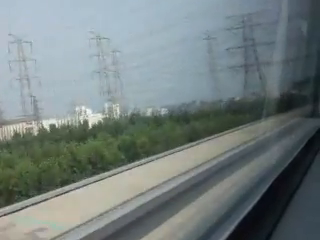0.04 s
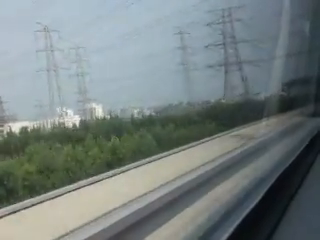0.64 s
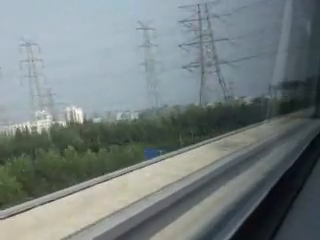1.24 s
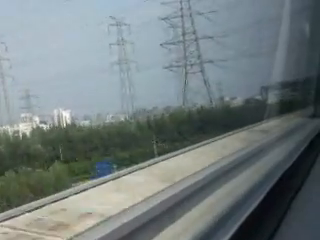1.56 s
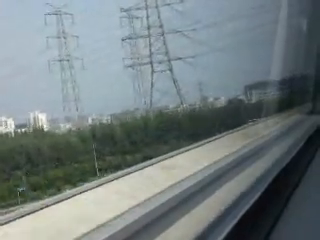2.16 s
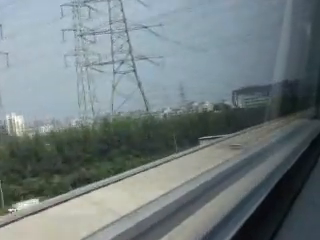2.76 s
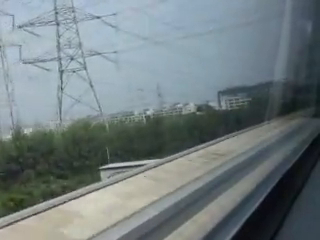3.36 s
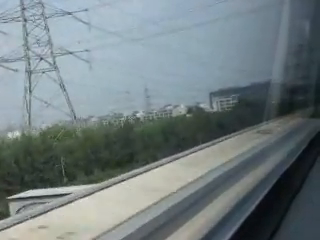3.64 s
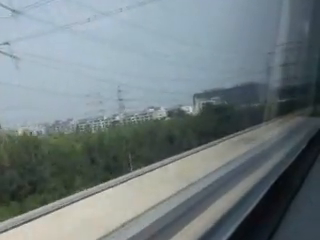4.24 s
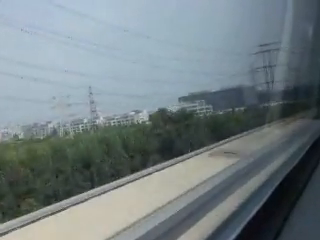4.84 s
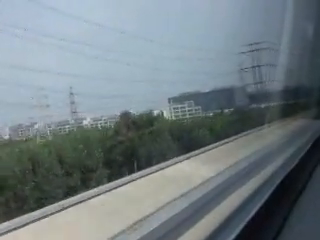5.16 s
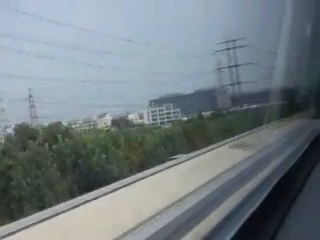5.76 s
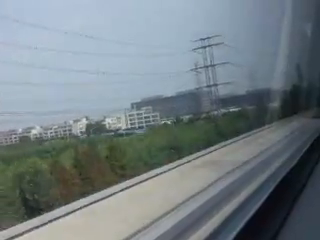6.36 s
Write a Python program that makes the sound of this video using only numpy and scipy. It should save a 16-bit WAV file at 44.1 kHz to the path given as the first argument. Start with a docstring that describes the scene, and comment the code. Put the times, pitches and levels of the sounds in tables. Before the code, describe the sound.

Inside a fast train, a deep rumble fills the car and creeps up slightly in pitch and level. Machinery throbs at one low pitch while air rushes dully past outside. Wall panels buzz faintly, a little more toward the end, and plastic trim gives two tiny ticks, one early and one late. A small microphone at the window seat gives a muffled sound with a thin high fizz.

```python
"""Rumble of a maglev train slowly gathering speed, heard from a window seat inside the car.
The guideway's stator packs and slots pull on the magnets and pass as a slowly rising drone. Wall panels
buzz, equipment hums at one pitch, air rushes over the skin outside, and the trim ticks twice.
The microphone is a pocket camera's, whose low sample rate adds a thin fizz."""
import sys
import numpy as np
from scipy import signal
from scipy.fft import rfft, irfft
from scipy.io import wavfile
from scipy.ndimage import uniform_filter1d, minimum_filter1d

SR = 44100
rng = np.random.default_rng(int(sys.argv[2]) if len(sys.argv) > 2 else 0)


def log_audio(samples):
    """Write samples as a 16-bit WAV file to the path given in sys.argv[1]."""
    # one column per channel
    frames = np.atleast_2d(samples).T
    # limit to full scale, then quantise
    limited = np.clip(frames, -1, 1)
    pcm = np.round(limited * 32767).astype(np.int16)
    wavfile.write(sys.argv[1], SR, pcm)


N = 291060
TIME_S = np.arange(N) / SR


def from_db(db):
    """Decibels to gain."""
    return 10 ** (np.asarray(db) / 20)


def unit_rms(x):
    """Scale to unit power."""
    return x / np.sqrt(np.mean(x ** 2) + 1e-20)


def drift(rate_hz):
    """A slow random curve that wanders at about rate_hz; rms 1."""
    step, settle = 40, 2000
    pole = np.exp(-2 * np.pi * rate_hz * step / SR)
    noise = rng.standard_normal(N // step + settle + 2)
    slow = signal.lfilter([1], [1, -2 * pole, pole * pole], noise)[settle:]
    return np.interp(np.arange(N) / step, np.arange(len(slow)), unit_rms(slow))


def throb(depth, rate_hz=6.1):
    """A gain around 1 that rises and falls quickly at random, with no slow trend."""
    quick = drift(rate_hz)
    return 1 + depth * unit_rms(quick - uniform_filter1d(quick, size=SR // 2))


def evened(x, span=11025):
    """Hold the level over span samples near 1 and keep the fast flutter."""
    power = uniform_filter1d(uniform_filter1d(x ** 2, span), span // 2)
    return x / np.sqrt(power + 1e-12)


def resonate(x, hz, width_hz):
    """A resonance with gain 1 at its top."""
    r = np.exp(-np.pi * width_hz / SR)
    feedback = [1, -2 * r * np.cos(2 * np.pi * hz / SR), r * r]
    return signal.lfilter(np.array([1, 0, -1]) * (1 - r * r) / 2, feedback, x)


def colour(x, spectrum, skirt_db):
    """Pass x through a spectrum that falls by skirt_db an octave beyond its ends; rms 1."""
    hz, level_db = np.transpose(spectrum)
    octave, points = np.log2(np.arange(N // 2 + 1) * SR / N + 1e-9), np.log2(hz)
    beyond = np.abs(octave - np.clip(octave, points[0], points[-1]))
    gain = from_db(np.interp(octave, points, level_db) - skirt_db * beyond)
    return unit_rms(irfft(rfft(x) * gain, N))


def wavering_tone(cycles, rough, rate_hz):
    """A tone whose strength and phase wander as the path through the car shifts; rms 1."""
    wander = 1 + rough * (drift(rate_hz) + 1j * drift(rate_hz))
    return unit_rms(np.real(wander * np.exp(2j * np.pi * cycles)))


def swells():
    """Lift in dB of the body's bounce and of the hum as they briefly swell or sag."""
    # bell-shaped swells and sags: middle t/s, half length/s, bounce lift/dB, hum lift/dB
    bells = [(.25, 0.34, -3.5, -3), (1.437, 0.25, -0.5, 6.5), (2.068, 0.067, 5, 3),
             (2.493, 0.093, -6.5, -9), (2.66, 0.084, 5, 4.5), (3.007, .06, -3.5, -9), (3.463, .05, 4, 4.5),
             (3.678, 0.064, 3.5, 3), (5.584, 0.029, 6, 10), (6.488, .05, -3, 8.5)]
    return sum(np.outer([bounce_db, hum_db], np.exp(-((TIME_S - middle_s) / half_s) ** 2))
               for middle_s, half_s, bounce_db, hum_db in bells)


def body_rumble(packs, bounce_db, roar_db):
    """The car around the seat shakes at random and in step with the stator packs pulling on its magnets."""
    # spectrum of the car body's bounce: f/Hz, relative level/dB
    bounce_spectrum = [(5, -8), (29, -5.5), (37, -6.5), (47, 8), (57, -4.5), (65, 9.5), (76, -7)]
    # spectrum of the roar from the floor: f/Hz, relative level/dB
    floor_spectrum = [(84, -10), (98, 0), (120, -5), (146, -8.5), (168, -12.5), (180, -10.5), (192, -6.5),
                      (204, -12.5), (226, -13), (243, -10), (262, -17), (330, -17)]
    sway = colour(rng.standard_normal(N), bounce_spectrum, skirt_db=44)
    pack_tone = from_db(-5) * wavering_tone(packs, rough=0.2, rate_hz=4.1)
    bounce = evened(sway + pack_tone, span=8000)
    # the pack overtones climb through the same floor resonances as the random shaking
    overtones = sum(wavering_tone(k * packs, rough=0.35, rate_hz=2.5) for k in range(2, 8))
    floor_drive = rng.standard_normal(N) + from_db(-33) * overtones
    roar = evened(colour(floor_drive, floor_spectrum, skirt_db=45.5))
    return from_db(bounce_db) * throb(depth=0.11) * bounce + from_db(roar_db) * roar


def slot_whine(packs, pack_hz, slots_per_pack=12):
    """Each stator slot tugs at the magnets: a thin, climbing tone that sings out at frame resonances."""
    # resonances of the magnet frame: f/Hz, width/Hz, level/dB
    frame_modes = [(547, 17, -28.5), (574, 11, -34)]
    slot_hz = slots_per_pack * pack_hz
    gain = sum(from_db(db) / (1 + (2 * (slot_hz - hz) / width_hz) ** 2)
               for hz, width_hz, db in frame_modes)
    return gain * wavering_tone(slots_per_pack * packs, rough=0.25, rate_hz=4)


def panel_buzz(packs, packs_per_beam=3):
    """Wall panels by the seat ring under a rough drive; side tones swell as they cross each resonance."""
    # tones around the slot whine, from uneven beam joints: multiple of the beam rate, relative level/dB
    side_tones = [(32, -7), (33, -5), (34, -14), (37, -7.5), (38, -8)]
    # resonances of the wall panels: f/Hz, width/Hz, relative level/dB
    panel_modes = [(496.4, 17, -8), (532.4, 21, -1.5), (575.5, 46, -1), (610, 28, -4)]
    # rise and fall of the buzz: t/s, relative level/dB
    buzz_levels = [(0, -25), (0.7, -25), (1.9, -28.5), (2.3, -24.5), (2.8, -27.5), (3.5, -28.5),
                   (4.2, -24.5), (4.7, -27.5), (5.5, -23), (6.3, -19.5), (6.6, -22.5)]
    beams = packs / packs_per_beam
    tones = sum(from_db(db) * wavering_tone(multiple * beams, rough=0.3, rate_hz=2)
                for multiple, db in side_tones)
    buzz, singing = 0, 0
    for hz, width_hz, db in panel_modes:
        band = resonate(rng.standard_normal(N), hz, 1.5 * width_hz)
        buzz += from_db(db) * unit_rms(resonate(band, hz, 1.5 * width_hz))
        singing += from_db(db) * resonate(tones, hz, width_hz)
    level_db = np.interp(TIME_S, *np.transpose(buzz_levels)) - 5
    return from_db(level_db) * evened(unit_rms(buzz) + singing)


def equipment_hum(hum_db, hum_hz=86.2):
    """On-board machinery hums and throbs at one pitch whatever the speed."""
    return from_db(hum_db) * throb(depth=0.29) * wavering_tone(hum_hz * TIME_S, rough=0.11, rate_hz=1.6)


def air_rush(level_db=-31.5, gust_db=0.35):
    """The turbulent layer on the skin, a wall away from the microphone: dull and nearly steady."""
    # spectrum of the rush inside the car: f/Hz, relative level/dB
    rush_spectrum = [(200, -10), (370, 1), (450, 1), (680, -0.5), (780, -3.5), (900, -11), (1100, -14.5),
                     (1350, -20.5), (2100, -24.5), (3000, -23), (4000, -27.5), (5400, -28)]
    gain = from_db(level_db + gust_db * drift(rate_hz=7))
    return gain * colour(rng.standard_normal(N), rush_spectrum, skirt_db=33)


def trim_ticks():
    """Plastic trim slips: each ring swells over a few cycles and dies at once."""
    # slips of the trim, two to a tick: t/s, peak level/dB, ring f/Hz, swell time/s
    slips = [(1.662, -36, 1850, 0.0011), (1.666, -35, 1960, 0.00068), (6.2805, -29.5, 3700, 0.00029),
             (6.287, -34, 3400, 0.00042)]
    ticks = np.zeros(N)
    for start_s, db, hz, swell_s in slips:
        age_s = np.clip(TIME_S - start_s, 0, 20 * swell_s)
        envelope = age_s / swell_s * np.exp(1 - age_s / swell_s)
        ticks += from_db(db) * envelope * np.sin(2 * np.pi * hz * age_s)
    return ticks


def limiter(x, ceiling=0.92, duck_s=0.02):
    """The camera ducks smoothly around any peak that would pass the ceiling."""
    span = int(duck_s * SR)
    allowed = ceiling / np.maximum(np.abs(x), ceiling)
    return x * uniform_filter1d(minimum_filter1d(allowed, span), span)


def scene(start_pack_hz=45.27, rise_hz_per_s=0.6):
    """The window seat, in mono; speed sets the pitch of the drone and the strength of the rumble."""
    gained_hz = rise_hz_per_s * TIME_S
    pack_hz = start_pack_hz + gained_hz
    packs = np.cumsum(pack_hz) / SR  # stator packs passed so far
    bounce_lift_db, hum_lift_db = swells()
    # level at the starting speed, plus so many dB for each Hz of pack rate gained
    bounce_db = -18.5 + 0.73 * gained_hz + bounce_lift_db
    hum_db = -19 + 0.26 * gained_hz + hum_lift_db
    roar_db = -20.5 + 0.64 * gained_hz
    drone = body_rumble(packs, bounce_db, roar_db) + slot_whine(packs, pack_hz) + panel_buzz(packs)
    return (drone + equipment_hum(hum_db) + air_rush() + trim_ticks())[None, :]


def record(dry, hold_samples=4, cutoff_hz=12500):
    """The camera samples at SR / 4 and holds each value, mirroring the rumble as a fizz around 11 kHz."""
    anti_alias = signal.butter(12, SR / hold_samples / 2, fs=SR, output="sos")
    limited = limiter(signal.sosfilt(anti_alias, dry))
    held = np.repeat(limited[:, ::hold_samples], hold_samples, axis=1)[:, :N]
    treble_cut = signal.ellip(10, 0.1, 80, cutoff_hz, fs=SR, output="sos")
    return signal.sosfilt(treble_cut, held)


dry = scene()
out = record(dry)
log_audio(out)
```